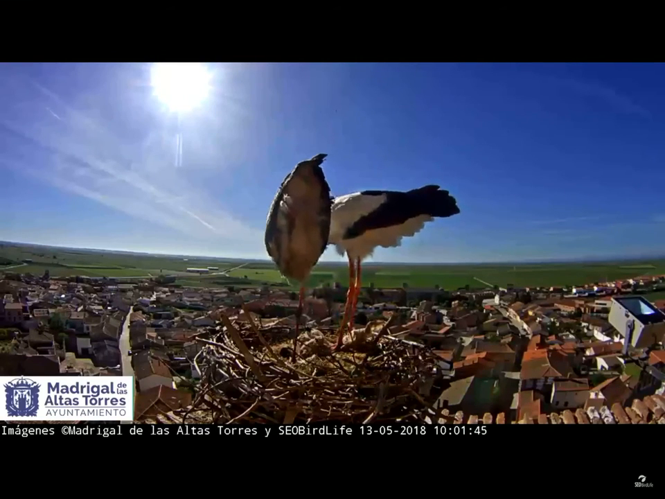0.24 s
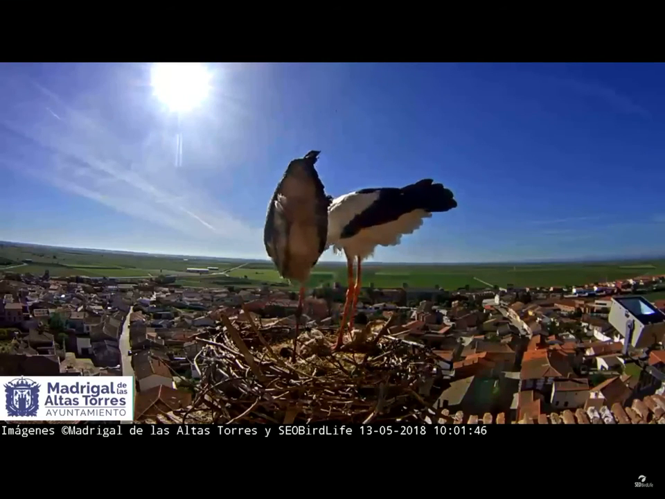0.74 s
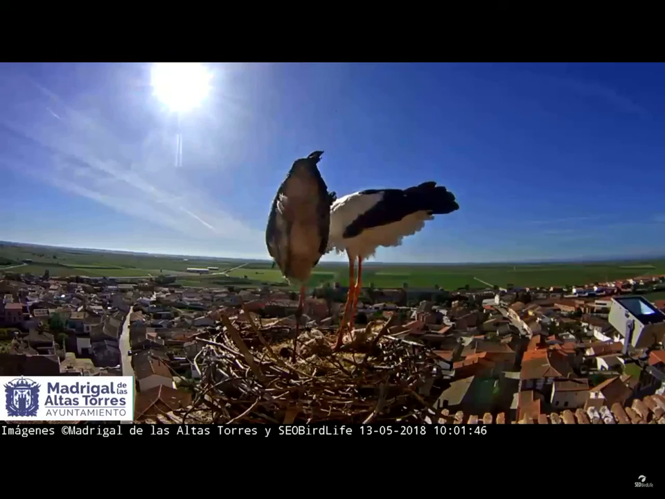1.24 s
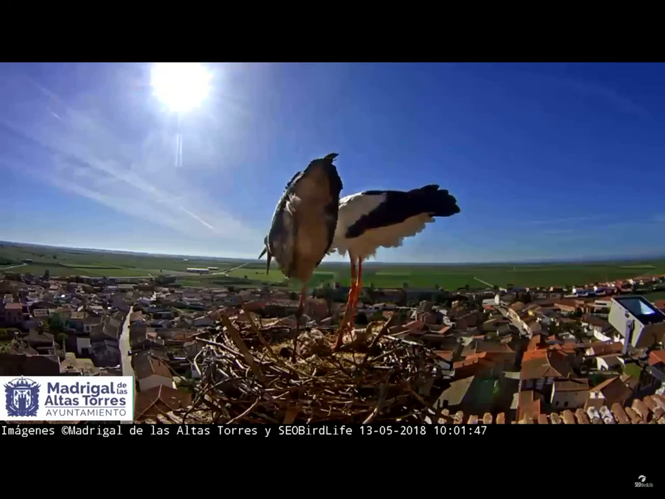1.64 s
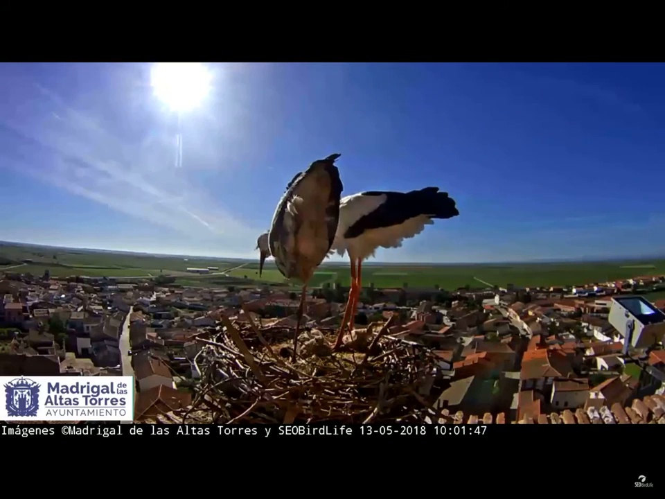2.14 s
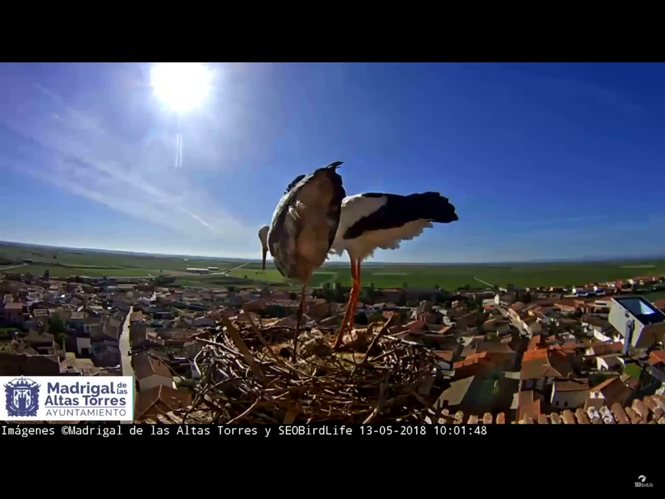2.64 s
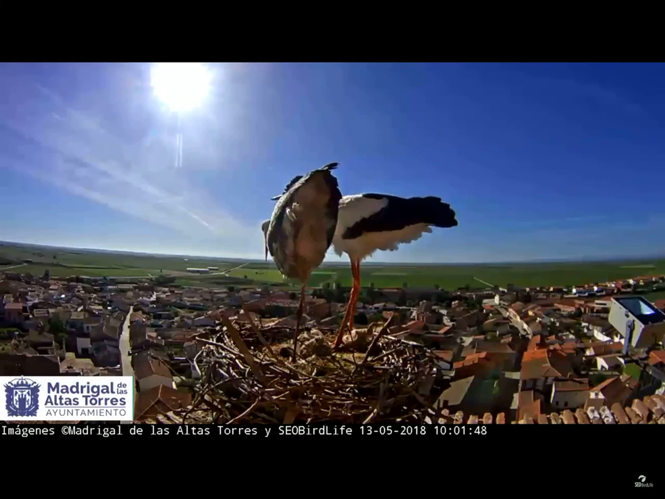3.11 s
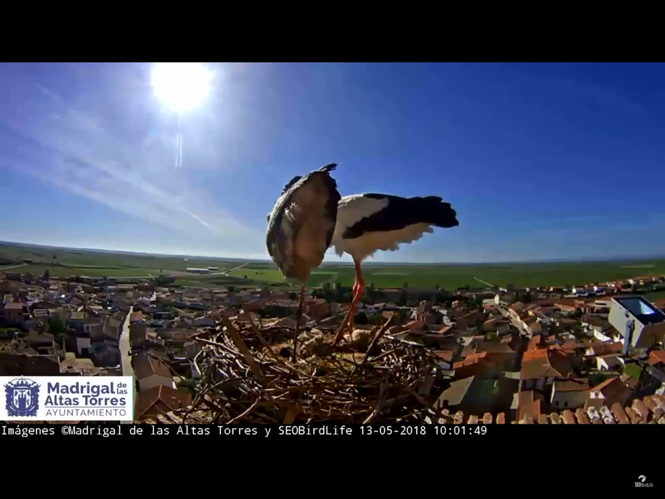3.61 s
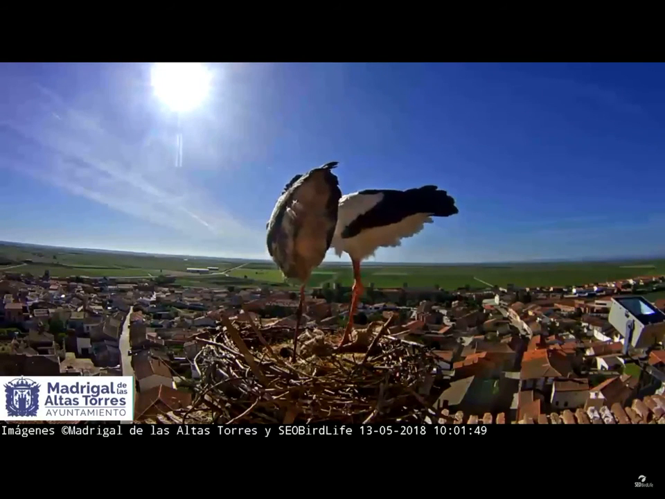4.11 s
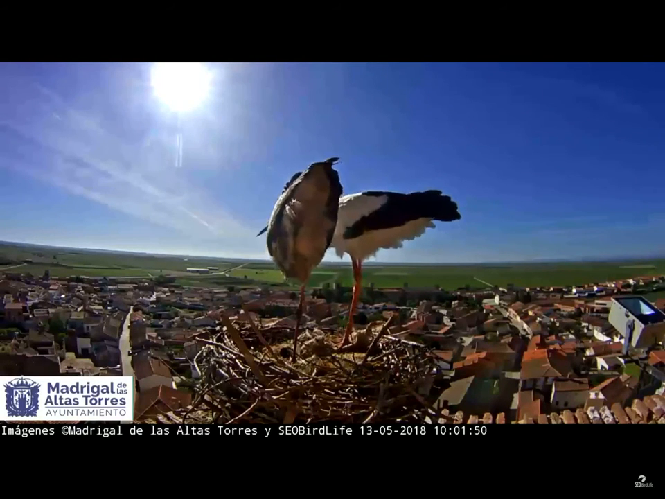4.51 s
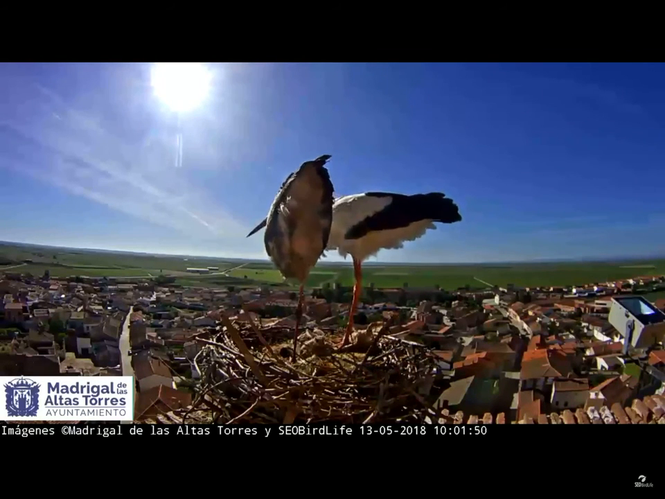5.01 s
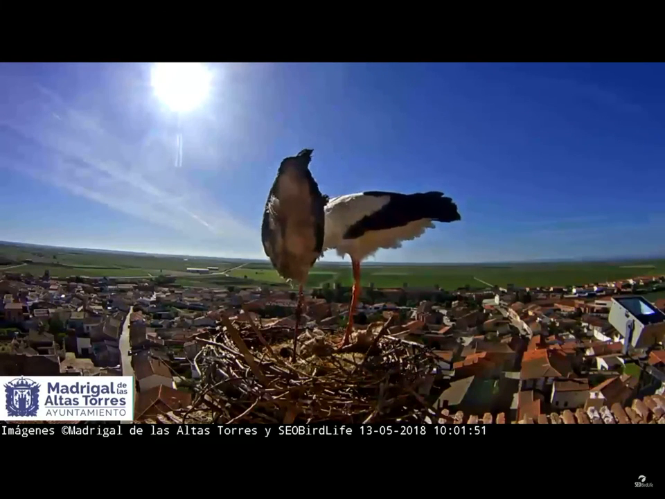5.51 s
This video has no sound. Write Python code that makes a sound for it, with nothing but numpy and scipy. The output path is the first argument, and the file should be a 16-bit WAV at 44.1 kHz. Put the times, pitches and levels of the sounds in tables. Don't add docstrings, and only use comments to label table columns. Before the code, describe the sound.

From the first instant two storks clatter their bills close to an outdoor camera microphone: hard, dry, hollow wooden knocks, one bird at about seven a second, the other nearly eight, so the claps slide between doubled hits and an uneven rattle. Each has a short nasal ring and a quick, soft scatter from nest and roofs. Beneath, low gusts thump and flutter irregularly, with faint mains hum and dull hiss. The second bird weakens and stops at about 1.8 s, leaving one steady series. Around 2.05 s a stronger gust rumbles and rasps; near 2.55 s twigs scrape very faintly. The second bird tries two claps at 2.7-2.85 s. At 2.95 s everything cuts to silence until 3.46 s, then returns abruptly. Both birds clatter continuously, colours shifting slightly, in mostly calmer wind with occasional bumps, until the end near 5.7 s. The sound is slightly gritty, with limited treble.

```python
import sys
import numpy as np
from scipy import signal
from scipy.fft import rfft, irfft, next_fast_len
from scipy.io import wavfile
from scipy.ndimage import uniform_filter1d, map_coordinates

SR = 44100
rng = np.random.default_rng(int(sys.argv[2]) if len(sys.argv) > 2 else 0)


def gain_from_db(level_db):
    decades = np.asarray(level_db, float) / 20
    return 10 ** decades


def digitize_waveform(pressure):
    field = np.atleast_2d(pressure).T
    bounded = np.clip(field, -1, 1)
    quanta = np.round(bounded * 32767).astype(np.int16)
    wavfile.write(sys.argv[1], SR, quanta)


N = 253575

# peak t/s, level/dB, half length/s, extra slow push/dB,
# extra fine flutter/dB
GUSTS = [(0, -51.5, 0.033, 6, -3), (0.088, -43.5, .035, 3.5, 0), (0.285, -42.5, 0.033, 2, -3.5),
         (0.365, -42, 0.032, 2, 5), (0.539, -44, 0.046, -2.5, -0.5), (0.767, -46.5, 0.096, -3, 2),
         (.93, -49.5, 0.058, -2.5, 4), (1.033, -45, .04, 1, 2.5), (1.262, -57.5, 0.057, 3, 1.5),
         (1.449, -43, 0.039, -1, 0.5), (1.574, -39, 0.021, 0.5, 1), (1.693, -52, .04, 5, 2),
         (1.892, -42.5, 0.029, 4, 0), (1.975, -42.5, 0.015, 9, -4), (2.054, -34.5, 0.033, -3, 1),
         (2.216, -39.5, 0.027, -3, -2.5), (2.287, -39.5, 0.035, 1.5, -5), (2.467, -54.5, 0.1, 9, 0),
         (2.755, -50.5, 0.039, 5, -5), (2.927, -47.5, 0.037, 8, 1),
         (3.468, -40.5, 0.027, -4, -7), (3.536, -44.5, 0.022, 2.5, 6), (3.633, -52, .03, 1, -2),
               (3.717, -48.5, .04, -1, 4), (3.82, -51, .04, 1, 2.5), (3.918, -54, 0.043, 2.5, -2),
               (4.31, -53, .04, -1, 1.5), (4.472, -46, 0.044, 1.5, 1.5), (4.544, -55, 0.038, 8, -1),
               (4.677, -51, 0.029, 7, 8), (4.747, -47.5, 0.035, 0, 7.5), (4.84, -49, 0.039, -1, -1),
               (5.019, -40.5, .035, -1.5, 2), (5.11, -51.5, 0.027, 6.5, -1), (5.19, -51, 0.044, -2, 2),
               (5.348, -43.5, 0.082, -3.5, 2), (5.666, -53, .05, 8.5, 0)]
# f/Hz, level per Hz/dB
HEAVE_COLOUR = [(6, -23), (15, 9), (30, -1.5), (45, -15.5), (70, -12), (120, -96.5)]
BUFFET_COLOUR = [(30, -45.5), (55, 3.5), (90, -3.5), (140, -9.5), (220, -52.5), (400, -100.5)]
FLUTTER_COLOUR = [(90, -42.5), (160, 3.5), (300, -8.5), (500, -18.5), (900, -41), (1600, -49.5),
                  (3000, -69)]
# t/s, level/dB, half length/s
TEARS = [(2.1, -74, 0.004), (2.045, -54.5, 0.023), (3.8, -77.5, 0.012), (3.545, -64, 0.014),
         (3.2, -63, 0.016)]
# f/Hz, level per Hz/dB
RASP_COLOUR = [(250, -35), (450, 4.5), (700, -5.5), (1200, -16.5), (2000, -37), (4000, -70)]
# f/Hz, rms level/dB
HUM = [
    (50, -44),
    (150, -67),
    (350, -80),
]
# f/Hz, level per Hz/dB
HISS_COLOUR = [(150, -3.5), (500, -1.5), (750, 0.5), (1200, -3.5), (3000, -7), (7000, -11.5), (8000, -26.5)]
# t/s,
# peak level/dB
FIRST_CLAPS = [(.0536, -28.5), (.1984, -29.5), (.3412, -30.5), (.487, -29.5), (.6315, -26.5), (.7758, -27),
               (.9203, -28.5), (1.066, -29), (1.21, -28.5), (1.3552, -28.5), (1.5002, -30), (1.6432, -30),
               (1.7869, -29.5), (1.932, -30.5), (2.0756, -30.5), (2.2193, -31), (2.363, -30.5),
               (2.5067, -31.5), (2.6486, -31.5), (2.796, -30.5), (2.9418, -30),
               (3.4518, -30.5),
               (3.6621, -30), (3.8059, -29.5), (3.9523, -30), (4.0963, -30), (4.2396, -30), (4.3832, -30),
               (4.5314, -28.5), (4.6792, -28), (4.8291, -29), (4.9772, -28), (5.1225, -29.5), (5.2688, -30),
               (5.4148, -29.5), (5.5613, -30), (5.7094, -31.5)]
SECOND_CLAPS = [(.0213, -30), (.1502, -31), (.28, -30), (.408, -30), (.534, -28.5), (.6621, -30),
                (.7912, -30.5), (.9188, -29), (1.045, -30.5), (1.1722, -30), (1.3013, -30.5),
                (1.428, -30.5), (1.5557, -31), (1.6801, -32.5), (1.8051, -39), (2.7118, -38.5),
                (2.8466, -32.5),
                (3.491, -33.5), (3.6191, -32.5), (3.7436, -32), (3.8653, -32.5), (3.9892, -31.5),
                (4.118, -30), (4.2491, -30.5), (4.3794, -31.5), (4.5115, -32.5), (4.6389, -32.5),
                (4.7622, -34.5), (4.8863, -34.5), (5.008, -34.5), (5.1364, -33.5), (5.2649, -31.5),
                (5.3933, -31.5), (5.5244, -31), (5.655, -30)]
# f/Hz, width/Hz, level/dB
FIRST_BILL = [(765.2, 49, -7.5), (1540, 22, -29), (1935, 75, -6), (2670, 165, -0.5), (3319, 86, -11.5),
              (3558, 184, -3.5), (3926, 50, -14), (4750, 63, -9.5), (4800, 97, -30.5), (5944, 77, -18.5),
              (6500, 210, -20.5)]
SECOND_BILL = [(714.3, 54, -9), (1410, 67, -30), (1690, 82, -2), (2201, 140, -14.5), (2423, 140, -8),
               (3042, 240, -16), (3280, 230, -15), (3890, 130, -15.5), (4430, 160, -11.5),
               (5000, 200, -35.5), (5570, 260, -9.5), (5315, 560, -26.5), (7550, 300, -35)]
# t/s, main ring set by the gape f/Hz, throat pouch/dB, facing us/dB
FIRST_POSE = [(0, 2740, -4, 2), (.45, 2756, -7, -5), (.85, 2690, -13, 2.5), (1.1, 2670, -1.5, 4.5),
              (2.35, 2670, -1.5, -0.5), (2.95, 2757, -1.5, 2), (3.8, 2674, 1, 6.5), (4.3, 2660, -3, 1.5),
              (4.7, 2710, -7, 2), (5.1, 2717, -1.5, -1), (5.75, 2714, -5.5, -1.5)]
SECOND_POSE = [(0, 1687, -1, -2), (1.1, 1660, 0.5, -1.5), (1.35, 1684, -3.5, 1), (1.7, 1600, 4, 4),
               (2.75, 1710, 6.5, -1), (3.5, 1566, 8.5, 0), (3.65, 1655, 1.5, -3), (4.2, 1657, 0, 3.5),
               (4.6, 1536, 8.5, 4.5), (5.1, 1530, 5, 0), (5.3, 1704, 4, -1), (5.75, 1607, -0.5, 0.5)]
# delay/s, level/dB
ECHOES = [(.0083, -15), (0.0148, -25.5), (0.0271, -17)]
# f/Hz, time to fall by 60 dB/s
ROOFS = [(500, 0.25), (2000, 0.098), (7000, 0.1)]
# t/s, level/dB, half length/s
RUSTLE = (2.555, -67.5, 0.023)
# f/Hz, level per Hz/dB
TWIG_COLOUR = [(1200, -40), (2100, 1), (3500, -3), (5800, -5), (7500, -31)]
# f/Hz, width/Hz, depth/dB
HOOD_DIPS = [(1746, 10, -11.5), (4200, 510, -2.5), (5140, 300, -17)]
# start t/s, end t/s
DROPOUT = (2.9482, 3.4598)
# f/Hz, level/dB
GRIT = [(300, -52), (800, -20.5), (3000, -22), (4500, -22.5), (6000, -17.5), (7500, -10.5)]
# f/Hz, level per bin/dB
KEPT = [(3000, -140), (5500, -125), (7000, -112), (7600, -104), (7900, -160)]

LULL_DB, MEAN_GUST_DB = -69, -46.5
HEAVE_DB, HEAVE_GROWS = -37.5, .8
FLUTTER_DB, FLUTTER_GROWS = -57, 1
GUST_SHAPE = 1.5
COLOUR_LUCK_DB = 1
MIRROR_YIELDS, MIRROR_LUCK_DB = 0.34, -0.5
OFFSET = .0077


def along(points, hz):
    f, value = np.transpose(points)
    return np.interp(np.log(hz + 1), np.log(f + 1), value)


def unit(x):
    return x / np.sqrt(np.mean(x ** 2) + 1e-20)


def wobble(rate):
    knots = rng.standard_normal(int(N * rate / SR) + 4)
    return map_coordinates(knots, [np.arange(N) * rate / SR])


def rush(colour):
    m = next_fast_len(N + 8192)
    gain = gain_from_db(along(colour, np.fft.rfftfreq(m, 1 / SR)))
    return unit(irfft(rfft(rng.standard_normal(m)) * gain, m)[:N])


def even(x, size):
    return x / np.sqrt(np.abs(uniform_filter1d(x ** 2, size)) + 0.014)


def gusts(t):
    power, shares = np.full(N, gain_from_db(2 * LULL_DB)), np.zeros((2, N))
    for s, db, span, push_db, shiver_db in GUSTS:
        lump = gain_from_db(2 * db) * np.exp(-np.abs((t - s) / span) ** GUST_SHAPE)
        power = power + lump
        shares = shares + np.outer([push_db, shiver_db], lump)
    return 10 * np.log10(power), *(shares / power)


def wind():
    t = np.arange(N) / SR
    eddies = wobble(22)
    buffet_db, push_db, shiver_db = gusts(t)
    above_mean_db = buffet_db - MEAN_GUST_DB
    heave_db = HEAVE_DB + HEAVE_GROWS * above_mean_db + push_db
    flutter_db = FLUTTER_DB + FLUTTER_GROWS * above_mean_db + shiver_db

    heave = gain_from_db(heave_db) * even(rush(HEAVE_COLOUR), size=5000)
    lumpy_buffet = gain_from_db(2.7 * eddies) * even(rush(BUFFET_COLOUR), size=2600)
    buffet = gain_from_db(buffet_db + 1.37) * unit(lumpy_buffet)
    lumpy_flutter = gain_from_db(0.37 * eddies + 4.8 * wobble(50)) * even(rush(FLUTTER_COLOUR), size=2000)
    flutter = gain_from_db(flutter_db) * unit(lumpy_flutter)
    tears = sum(gain_from_db(db) * np.exp(-((t - s) / span) ** 2) for s, db, span in TEARS)
    rasp = tears * even(rush(RASP_COLOUR), size=700)

    breaks = np.array([[0], [DROPOUT[0]], [DROPOUT[1]]])
    ease = 1 - np.exp(-np.min(np.abs(t - breaks), axis=0) / .004)
    return ease * (heave + buffet + flutter + rasp)


def hum():
    t = np.arange(N) / SR
    return sum(np.sqrt(2) * gain_from_db(db + 0.37 * wobble(9.7)) * np.sin(2 * np.pi * hz * t) for hz, db in HUM)


def hiss():
    return gain_from_db(-75.5 + 0.88 * wobble(9)) * rush(HISS_COLOUR)


def posed(claps, pose, upper, edge):
    s, db = np.transpose(claps)
    knots, *columns = np.transpose(pose)
    ring_hz, pouch_db, facing_db = [np.interp(s, knots, column) for column in columns]
    luck_db = COLOUR_LUCK_DB * rng.standard_normal((len(s), 3)).T
    pouch_db = pouch_db + luck_db[0]
    upper_db = upper[0] + upper[1] * facing_db + luck_db[1]
    edge_db = edge[0] + edge[1] * facing_db + luck_db[2]
    return np.transpose([s, db, ring_hz, pouch_db, upper_db, edge_db])


def bill_ring(bill, ring_hz, pouch_db, upper_db, edge_db, luck, pull, t):
    hz, width_hz, level_db = np.transpose(bill)[:, :, None]
    main = np.argmax(level_db)
    width_hz = np.maximum(width_hz, hz / 26)
    is_upper = (hz > 1.2 * hz[main]) & (hz < 3900)
    colour_db = pouch_db * (hz < 1000) + upper_db * is_upper + edge_db * (hz > 3900)
    size = gain_from_db(level_db + colour_db + 1.3 * luck[0]) * width_hz
    now_hz = hz * (1 + 0.0073 * luck[1])
    now_hz *= (ring_hz / hz[main]) ** (pull * (hz > 1000) * (hz < 2600))
    now_hz[main] = ring_hz
    turn = 2 * np.pi * now_hz * t + .25 * luck[2]
    ring = np.sum(size * np.exp(-np.pi * width_hz * t) * np.sin(turn), axis=0)
    ring *= 1 - np.exp(-t / .0001)
    return ring / np.abs(ring).max()


def roof_tail(t):
    hz, frames, z = signal.stft(rng.standard_normal(len(t)), SR, nperseg=128)
    fade = gain_from_db(-60 * frames / along(ROOFS, hz)[:, None])
    tail = signal.istft(z * fade, SR, nperseg=128)[1][:len(t)]
    return np.pad(tail / np.linalg.norm(tail), (90, 0))


def surroundings(tail, pouch_db, luck, bounce, bounce_db, roofs_db):
    space = gain_from_db(roofs_db) * tail
    space[0] = 1
    floor = round(bounce * SR * (1 + 0.025 * luck[0, 0, 0]))
    floor_db = bounce_db - MIRROR_YIELDS * max(pouch_db, 0) + MIRROR_LUCK_DB * luck[2, 0, 0]
    space[floor - 4:floor + 5] += gain_from_db(floor_db) * np.hanning(9) / 4
    for delay, echo_db in ECHOES:
        space[round(delay * SR)] += gain_from_db(echo_db)
    return space


def clatter(claps, bill, bounce, bounce_db, snap_db, roofs_db, pull):
    out, t = np.zeros(N + SR), np.arange(SR // 5) / SR
    short = t[:SR // 16]
    lucks = rng.standard_normal((len(claps), 3, len(bill), 1))
    for (s, db, ring_hz, pouch_db, upper_db, edge_db), luck in zip(claps, lucks):
        ring = bill_ring(bill, ring_hz, pouch_db, upper_db, edge_db, luck, pull, short)
        snap = gain_from_db(snap_db - 60 * short / 0.016) * np.diff(rng.standard_normal(len(short) + 1))
        tail = roof_tail(t)
        space = surroundings(tail, pouch_db, luck, bounce, bounce_db, roofs_db)
        heard = signal.fftconvolve(ring, space)
        heard[:len(snap)] += snap
        crack = ring * np.exp(-short / .0003)
        heard += gain_from_db(roofs_db + 2) * signal.fftconvolve(crack, tail)
        out[round(s * SR):][:len(heard)] += gain_from_db(db) * heard
    return out[:N]


def storks():
    one = posed(FIRST_CLAPS, FIRST_POSE, upper=(.1, .95), edge=(3, .9))
    two = posed(SECOND_CLAPS, SECOND_POSE, upper=(2.5, .6), edge=(-4.5, .9))
    first = clatter(one, FIRST_BILL, bounce=0.0011723, bounce_db=5.0, snap_db=-21, roofs_db=-9, pull=1.7)
    second = clatter(two, SECOND_BILL, bounce=0.001326, bounce_db=1.5, snap_db=-16, roofs_db=-9.0, pull=0.81)
    return first + second


def rustle():
    s, db, span = RUSTLE
    swell = np.exp(-((np.arange(N) / SR - s) / span) ** 2)
    return gain_from_db(db + 4.5 * wobble(120)) * swell * rush(TWIG_COLOUR)


def scene():
    return (wind() + hum() + hiss() + storks() + rustle())[None]


def hood(x):
    m = next_fast_len(N + 8192)
    f = np.fft.rfftfreq(m, 1 / SR)
    response = 1
    for hz, width_hz, db in HOOD_DIPS:
        detune = hz * hz - f * f
        response = response * (detune + 1j * f * width_hz * gain_from_db(db)) / (detune + 1j * f * width_hz)
    return irfft(rfft(x, m) * response, m)[..., :N]


def grit_and_fading(x):
    x = np.pad(x, ((0, 0), (0, 2816)), "reflect")
    hz, _, z = signal.stft(x, SR, "cosine", nperseg=2816, boundary="even", padded=False)
    grit = signal.stft(rng.standard_normal(x.shape), nperseg=2816, padded=False)[2]
    grit = grit / np.sqrt(np.mean(np.abs(grit) ** 2))
    treble = np.abs(z * (hz[:, None] > 500)) ** 2
    band = np.sqrt(np.abs(uniform_filter1d(treble, size=170, axis=-2)))
    gritty = z + gain_from_db(along(GRIT, hz))[:, None] * band * grit
    near = np.abs(uniform_filter1d(np.abs(gritty) ** 2, size=20, axis=-2))
    kept = near ** 2 / (near ** 2 + gain_from_db(along(KEPT, hz))[:, None] ** 4 + 1e-40)
    edge = gain_from_db(np.interp(hz, [7080, 7416, 7980, 9450], [0, -3.0, -32.5, -36.5]))
    return signal.istft(gritty * kept * edge[:, None], window="cosine", nperseg=2816)[1][..., :N]


def top_cut(x):
    return signal.sosfilt(signal.butter(12, 8140, fs=SR, output="sos"), x)


def record(dry):
    t = np.arange(N) / SR
    lost = (t > DROPOUT[0]) & (t < DROPOUT[1])
    mix = grit_and_fading((hood(dry) + OFFSET) * ~lost)
    return top_cut(mix)


dry = scene()
out = record(dry)
digitize_waveform(out)
```